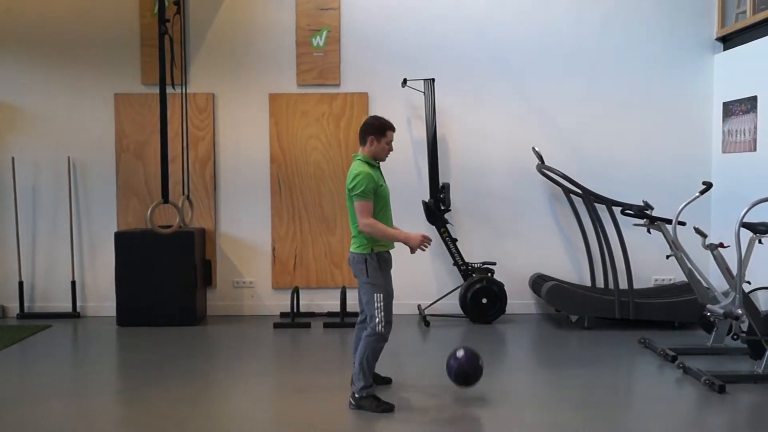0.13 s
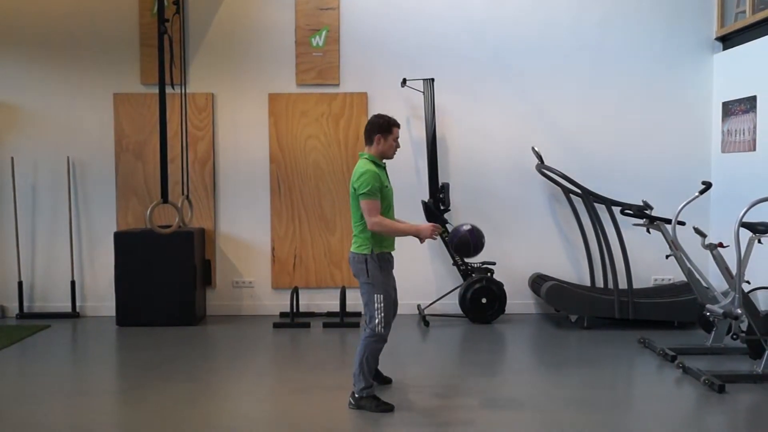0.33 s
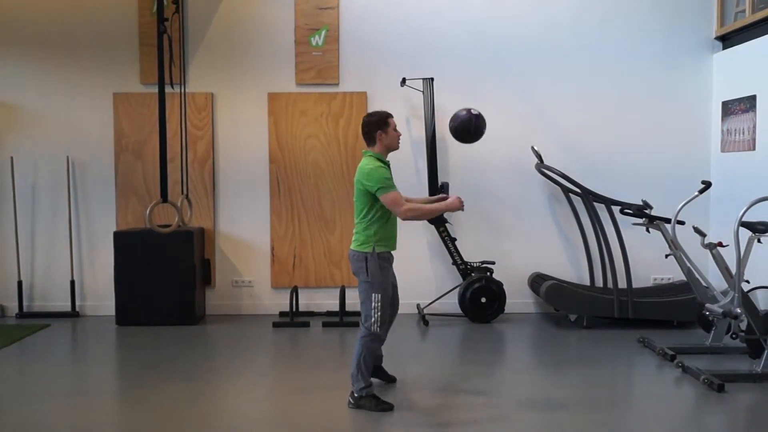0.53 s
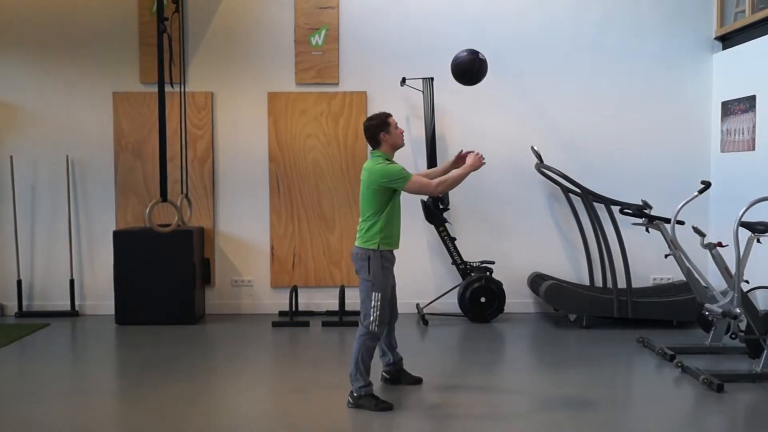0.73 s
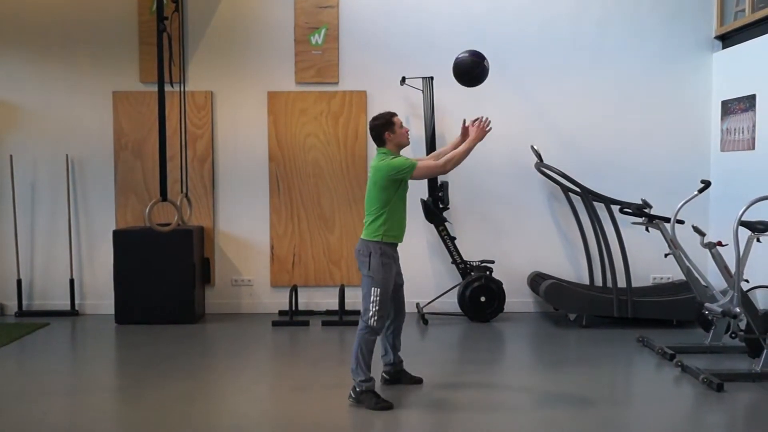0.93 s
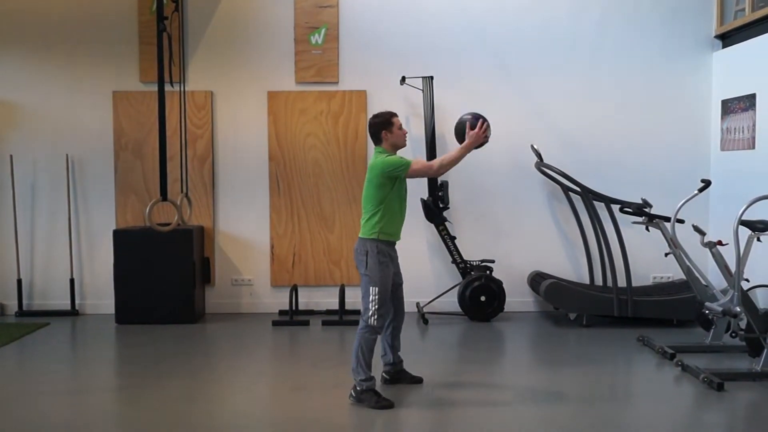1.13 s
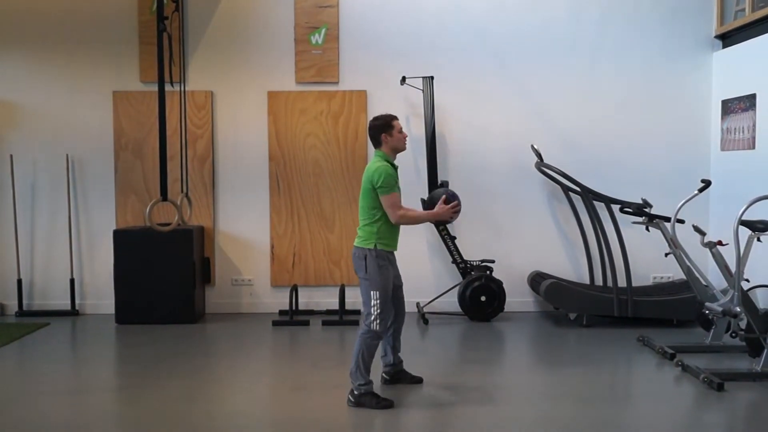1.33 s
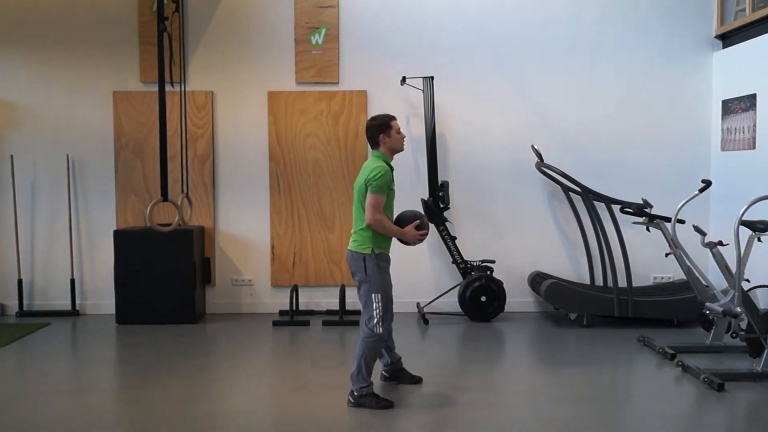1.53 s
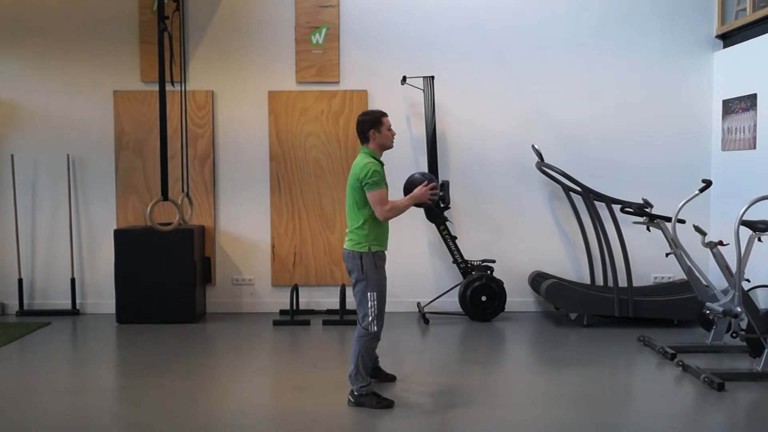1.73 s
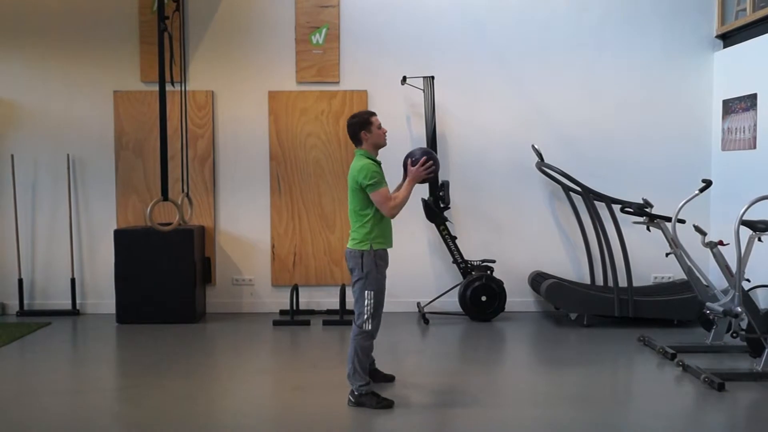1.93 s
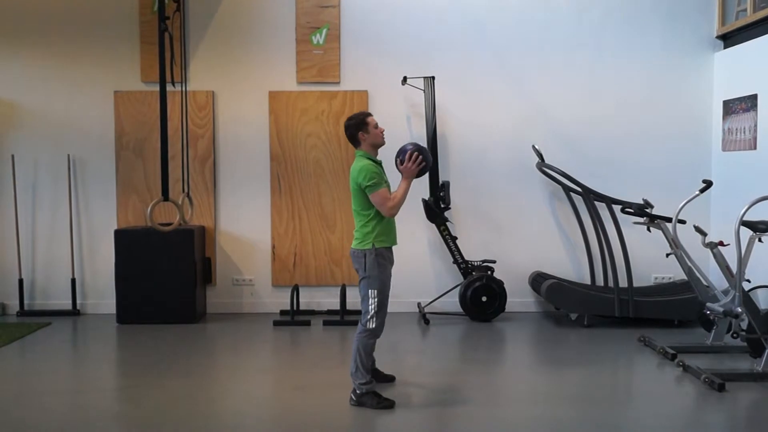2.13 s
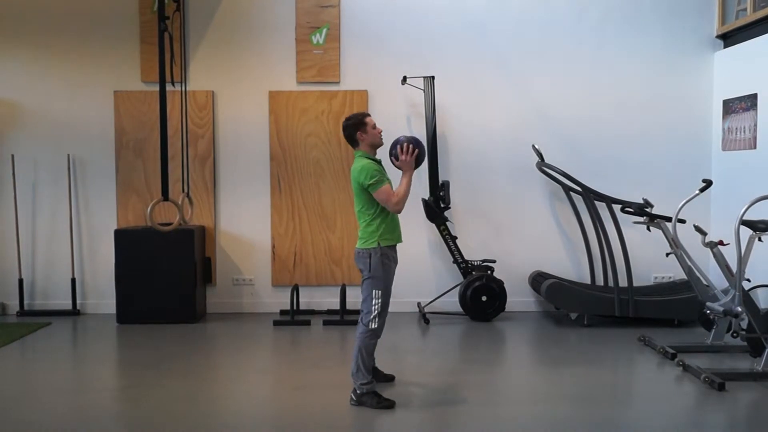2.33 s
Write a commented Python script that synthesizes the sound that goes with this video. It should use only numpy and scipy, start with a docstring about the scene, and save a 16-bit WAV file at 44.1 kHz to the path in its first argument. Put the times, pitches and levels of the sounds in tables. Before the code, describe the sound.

A heavy rubber ball slams onto a hard gym floor at about 0.2 s: a very loud, sharp crack with a short thud, quick wall echoes and a hollow low-mid ring, fading over more than a second. At about 1.17 s two hands catch it with a much quieter, crisp double slap. From 1.7 s palms hiss softly on rubber, creaking faintly around 2.0-2.2 s. Faint ventilation and microphone hiss throughout.

```python
"""Ball slammed and caught in a gym

A heavy rubber ball slams onto the hard floor of a large gym and is caught with a slap of both hands.
Damped sines and decaying noise make the blows; delayed blows, filling and dying noise and low modes
make the hall. Sliding hands hiss as shaped noise, then creak as slip pulses through resonators.
Steady noise is the ventilation and microphone hiss, and a limiter holds down the loudest moments."""
import sys
import numpy as np
from scipy import signal
from scipy.fft import rfft, irfft, next_fast_len
from scipy.io import wavfile
from scipy.ndimage import uniform_filter1d, minimum_filter1d

SR = 44100
rng = np.random.default_rng(int(sys.argv[2]) if len(sys.argv) > 2 else 0)


def field_ratio(decibels):
    """Amplitude ratio for a level in dB (20 dB per decade); scalars and array-likes work."""
    return 10 ** (np.asarray(decibels, dtype=float) / 20)


def unload_audio(sound):
    """Save the sound as a 16-bit wav file, at the path given as the first command line argument."""
    columns = np.transpose(np.atleast_2d(sound))
    # keep every value between -1 and 1, then stretch to whole-number steps
    steps = np.round(np.clip(columns, -1, 1) * 32767)
    wavfile.write(sys.argv[1], SR, steps.astype(np.int16))


N = 105840
SLAM_S = 0.2175  # arrival of the slam through the air


def unit(x):
    """Normalization: scales a signal to rms 1."""
    return x / np.sqrt(np.mean(x ** 2) + 1e-20)


def along(points, hz):
    """Spectral interpolation: (Hz, value) points joined on a logarithmic frequency axis."""
    f, v = np.transpose(points)
    return np.interp(np.log(hz + 1), np.log(f + 1), v)


def filtered(x, response):
    """Linear filtering: the spectrum of x times a complex response of frequency."""
    m = next_fast_len(N + SR // 2)
    return irfft(rfft(x, m) * response(np.fft.rfftfreq(m, 1 / SR)), m)[..., :N]


def coloured_noise(colour):
    """Spectral shaping: mono noise of rms 1 with a colour of (Hz, dB) points."""
    return unit(filtered(rng.standard_normal(N), lambda hz: field_ratio(along(colour, hz))))


def since(s):
    """Elapsed time: seconds after moment s, zero before it."""
    return np.clip(np.arange(N) / SR - s, 0, None)


def ring(s, hz, t60, rise_s):
    """Damped oscillation: a sine that starts at s, builds up and decays exponentially."""
    t = since(s)
    return np.sin(2 * np.pi * hz * t) * field_ratio(-60 * t / t60) * (1 - np.exp(-t / rise_s))


def pan(x, db):
    """Intensity stereo: mono to two channels with a left-right level difference."""
    return x * field_ratio([[db / 2], [-db / 2]])


def diffuse_noise(colour_db, alike):
    """Partial coherence: stereo noise of rms 1 whose mid-side balance sets the left-right likeness."""
    def response(hz):
        angle = np.arccos(np.clip(along(alike, hz), -1, 1)) / 2
        return field_ratio(colour_db(hz)) * [np.cos(angle), np.sin(angle)]

    mid, side = filtered(rng.standard_normal((2, N)), response)
    return unit(np.array([mid + side, mid - side]))


# Spectrum of ventilation and microphone hiss. Each row: frequency in Hz, relative density in dB per Hz.
AIR_COLOUR = [(15, -71), (25, -46), (80, -26), (123, -10), (170, -6.5), (659, -2.5), (1500, -5.5),
              (5000, -15), (14400, -21), (16000, -31)]
# Coherence of that noise. Each row: frequency in Hz, left-right likeness from -1 to 1.
AIR_LIKENESS = [(60, 0.9), (240, 0.72), (950, -0.36), (3770, -0.19), (15000, -0.03)]


def air():
    """Stationary noise: ventilation and microphone hiss at a constant -56.5 dB rms."""
    return field_ratio(-56.5) * diffuse_noise(lambda hz: along(AIR_COLOUR, hz), AIR_LIKENESS)


def tremor():
    """Structure-borne sound: faster in the slab than in air, it arrives ahead of the crack."""
    lead_s, hz, t60_s, rise_s = 0.00566, 778, 0.014, 0.0028
    return field_ratio(-17.5) * pan(ring(SLAM_S - lead_s, hz, t60_s, rise_s), -24.5)


# Spectrum of the crack. Each row: frequency in Hz, relative level in dB.
CRACK_COLOUR = [(300, -15), (1500, 15), (2500, 4), (6000, 9.5), (11000, 8), (16000, -7)]


def blow(s):
    """Impact radiation: a noise crack, a sharp ring near 2.4 kHz at contact and the thud of the flattening
    shell."""
    crack_t60_s = 0.00039
    crack = field_ratio(5.5 - 60 * since(s) / crack_t60_s) * coloured_noise(CRACK_COLOUR) * (since(s) > 0)
    snap = field_ratio(5) * ring(s, 2390, 0.0024, 0.0001)
    thud_lag_s = 0.0017
    thud = field_ratio(0.5) * ring(s + thud_lag_s, 500, 0.015, 0.00052)
    return crack - snap + thud


def slab_push():
    """Elastic yielding: the slab gives under the weight as a damped 50 Hz oscillation."""
    return field_ratio(-29) * pan(ring(SLAM_S, 50, 0.09, 0.002), -13)


# Air in the ball, ringing on in the hall. Each row: frequency in Hz, level at the slam in dB,
# level at the catch in dB, t60 in seconds. Levels apply before build-up and decay.
CAVITY_MODES = [(282, -26, -49, 1.1), (295.1, -22.5, -47.5, 1.56), (431, -21, -64, 0.9),
                (447.2, -17.5, -70, 1.34)]


def cavity(s, level_column, rise_s):
    """Cavity resonance: the enclosed air rings in damped modes, with levels from the given column."""
    return sum(field_ratio(row[level_column]) * ring(s, row[0], row[3], rise_s) for row in CAVITY_MODES)


# Standing waves of the room. Each row: frequency in Hz, level before build-up and decay in dB,
# t60 in seconds.
ROOM_MODES = [(63, -55, 2), (70.8, -51.5, 3.33), (120.8, -34, 0.92), (159.3, -35, 1.3)]


def room_modes():
    """Modal superposition: low standing waves build up, beat together and decay."""
    return sum(field_ratio(db) * ring(SLAM_S, hz, t60, 0.025) for hz, db, t60 in ROOM_MODES)


# Decay of the hall. Each row: frequency in Hz, t60 in seconds.
HALL_DECAY = [(30, .8), (60, 1.9), (160, 1.26), (420, 1.318), (1100, 1.455), (2900, 1.347), (6000, 1.033),
              (10000, 0.63), (15000, 0.4)]
# Coherence of the diffuse field. Each row: frequency in Hz, left-right likeness from -1 to 1.
HALL_LIKENESS = [(60, 0.37), (150, 0.95), (380, 0.68), (950, 0.62), (2380, 0.64), (5980, 0.38),
                 (15000, -0.3)]
# Stereo balance of the hall. Each row: frequency in Hz, left-right difference in dB.
HALL_BALANCE = [(60, -3), (240, 1), (950, -1.5), (3770, -1.5), (15000, -2.5)]


def hall(s, colour_db, fill_s):
    """Reverberation: a diffuse field fills up after s, and each frequency decays at its own rate."""
    hz, t, z = signal.stft(diffuse_noise(colour_db, HALL_LIKENESS), SR, nperseg=1024)
    decay_db = -60 * np.clip(t - s, 0, None) / along(HALL_DECAY, hz)[:, None]
    balance_db = np.multiply.outer([0.5, -0.5], along(HALL_BALANCE, hz))[..., None]
    tail = signal.istft(z * field_ratio(decay_db + balance_db), SR, nperseg=1024)[1][:, :N]
    return tail * (1 - np.exp(-since(s) / fill_s))


# Narrow peaks in the slam tail's noise spectrum. Each row: centre in Hz, half-width at 1/e of the
# dB value in Hz, height in dB.
TAIL_PEAKS = [(253, 11.5, 4.5), (557, 28, 0), (688, 10, 1.5), (729, 10, 4)]


def tail_peaks_db(hz):
    """Spectral emphasis: bell-shaped lifts around the listed centres."""
    return sum(db * np.exp(-((hz - centre) / width) ** 2) for centre, width, db in TAIL_PEAKS)


# Broad spectrum of the slam's tail, before the narrow peaks. Each row: frequency in Hz,
# relative density in dB per Hz.
SLAM_COLOUR = [(15, -72), (25, -52), (100, -24.5), (242, -6.5), (344, -4), (470, 1), (624, -8), (800, -9.5),
               (1050, -18.5), (1560, -13), (2410, -15), (3620, -16.5), (8000, -23), (12900, -24),
               (16000, -28)]


def slam_tail():
    """Reverberant response: the hall rings on after the slam, with a few narrow peaks."""
    return field_ratio(-7.5) * hall(SLAM_S, lambda hz: along(SLAM_COLOUR, hz) + tail_peaks_db(hz), 0.019)


# Discrete reflections from the walls. Each row: lag in seconds, level relative to the direct blow in dB,
# left-right difference in dB.
WALL_ECHOES = [(.0135, -13, -20), (.018, -23, -5), (.026, -9.5, 7), (.033, -14, 4)]


def wall_echoes():
    """Specular reflection: delayed, weaker blows return from the walls."""
    return sum(field_ratio(db) * pan(blow(SLAM_S + lag), side_db) for lag, db, side_db in WALL_ECHOES)


def slam():
    """Superposition: structure-borne, direct, resonant and reflected parts of the slam add up."""
    direct = tremor() + pan(blow(SLAM_S), -0.81) + slab_push()
    ringing = cavity(SLAM_S, 1, 0.019) + room_modes()
    return direct + ringing + slam_tail() + wall_echoes()


# Fingers and palms meeting the ball. Each row: start in seconds, level before the rise and decay in dB,
# t60 in seconds.
HAND_SLAPS = [(1.1636, -36, 0.0073), (1.1669, -22, 0.01), (1.177, -18.5, .016), (1.1835, -22, .008)]
# Spectrum of skin on rubber. Each row: frequency in Hz, relative density in dB per Hz.
SLAP_COLOUR = [(800, -29), (1800, -8.5), (3600, 1.5), (5000, -9), (8000, -16), (15000, -22.5)]


def slaps():
    """Contact noise: fast-rising, decaying bursts of skin on rubber within 20 ms."""
    envelope = 0
    for s, db, t60 in HAND_SLAPS:
        envelope = envelope + field_ratio(db - 60 * since(s) / t60) * (1 - np.exp(-since(s) / 0.00043))
    return pan(coloured_noise(SLAP_COLOUR) * envelope, -2.4)


# Spectrum of the catch's tail. Each row: frequency in Hz, relative density in dB per Hz.
CATCH_COLOUR = [(90, -47), (170, -26), (240, -5.5), (288, -1.5), (340, -7), (700, -14), (1100, -12.5),
                (2000, -5), (2600, -8), (3500, 0), (4700, -9.5), (7000, -11.5), (16000, -19.5)]


def catch():
    """Impact excitation: slaps, the weight landing in the palms, ringing air and the hall's answer."""
    first_s, weight_s, fill_s = HAND_SLAPS[0][0], HAND_SLAPS[1][0], 0.0085
    pat = field_ratio(-30.5) * ring(weight_s, 395, 0.032, 0.0014)
    tail = field_ratio(-29.5) * hall(first_s, lambda hz: along(CATCH_COLOUR, hz), fill_s)
    return slaps() + pat + cavity(weight_s, 2, fill_s) + tail


# Loudness of palms sliding on the ball. Each row: time in seconds, noise level in dB.
RUB_LEVEL = [(1.72, -64), (1.75, -54.5), (1.785, -49), (1.85, -51), (1.93, -55.5), (2.1, -60.5), (2.3, -68)]
# Spectrum of the sliding. Each row: frequency in Hz, relative density in dB per Hz.
RUBBER_COLOUR = [(150, -19), (300, -4.5), (900, -1.5), (2500, -3), (7000, -12), (15000, -21.5)]


def rub():
    """Sliding friction: soft noise that swells and fades as palms slide on rubber."""
    level_db = np.interp(np.arange(N) / SR, *np.transpose(RUB_LEVEL), left=-200, right=-200)
    return field_ratio(level_db) * diffuse_noise(lambda hz: along(RUBBER_COLOUR, hz), HALL_LIKENESS)


# Uneven slips of skin. Each row: time in seconds, pulse strength ahead of the resonators in dB.
CREAK_SLIPS = [(1.983, -25), (2.001, -16), (2.02, -24), (2.037, -24), (2.06, -18.5), (2.08, -21.5),
               (2.098, -22.5), (2.116, -33), (2.14, -25), (2.165, -27)]
# Resonators excited by the slips. Each row: centre in Hz, bandwidth in Hz, peak gain in dB.
CREAK_RESONANCES = [(877, 83, -3.5), (1210, 120, -6), (1730, 400, -8), (444, 230, -15.5)]


def creak():
    """Stick-slip friction: soft pulses excite resonators, and the hall blurs the result."""
    corner_hz = 900  # softens each slip
    slips = 0
    for s, db in CREAK_SLIPS:
        slips = slips + field_ratio(db) * np.exp(-since(s) * 2 * np.pi * corner_hz) * (since(s) > 0)

    def body(f):
        total = 0
        for k, (centre, width, db) in enumerate(CREAK_RESONANCES):
            resonance = 1j * f * width / (centre * centre - f * f + 1j * f * width)
            total = total + (-1) ** k * field_ratio(db) * resonance  # alternating polarity
        return total

    direct = filtered(slips, body)
    t60_s = along(HALL_DECAY, CREAK_RESONANCES[0][0])
    echo = rng.standard_normal((2, SR)) * field_ratio(-60 * np.arange(SR) / SR / t60_s)
    echo = echo / np.linalg.norm(echo[0])
    blur = signal.fftconvolve(direct[None], echo, axes=1)[:, :N]
    return direct + field_ratio(3.5) * blur


def scene():
    """Superposition: all sources in the gym add linearly."""
    return air() + slam() + catch() + rub() + creak()


def band_limit(x):
    """A steep low-pass at the top of the band."""
    return signal.sosfilt(signal.butter(12, 16680, fs=SR, output="sos"), x)


def record(dry):
    """Peak limiting: gain falls at once and recovers at a steady rate; the top treble is cut off."""
    ceiling_db, look_s, release_db_per_s, top_hz = -5, 0.0012, 93, 15900
    over_db = np.clip(20 * np.log10(np.abs(dry).max(0) + 1e-9) - ceiling_db, 0, None)
    span = max(int(look_s * SR), 3)
    held_db = -minimum_filter1d(-over_db, span)  # moving maximum
    fall_db = release_db_per_s * np.arange(N) / SR
    cut_db = np.maximum.accumulate(held_db + fall_db) - fall_db
    limited = dry * field_ratio(-uniform_filter1d(cut_db, span))
    mix = filtered(limited, lambda hz: hz < top_hz)
    return band_limit(mix)


dry = scene()
out = record(dry)
unload_audio(out)
```